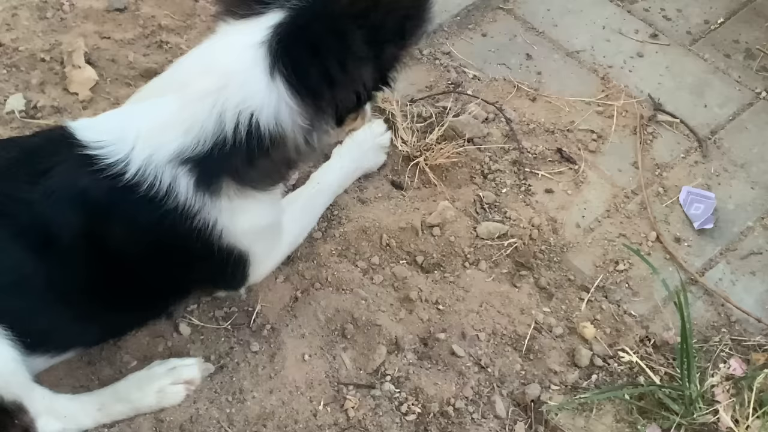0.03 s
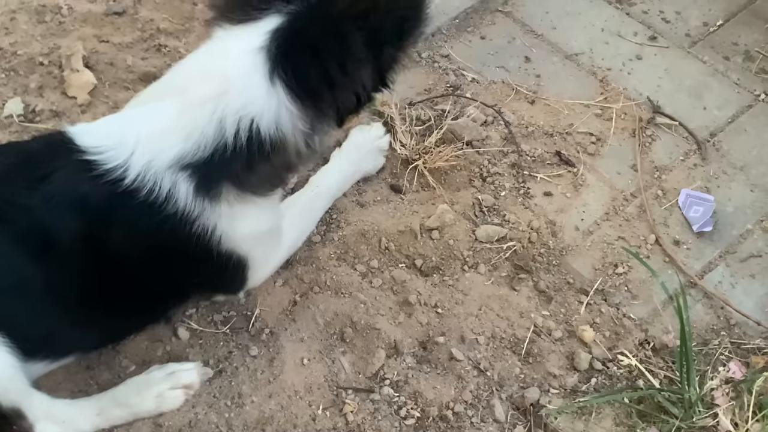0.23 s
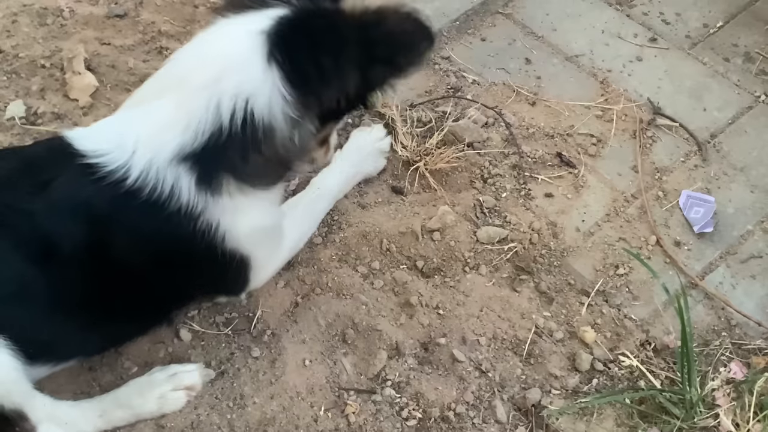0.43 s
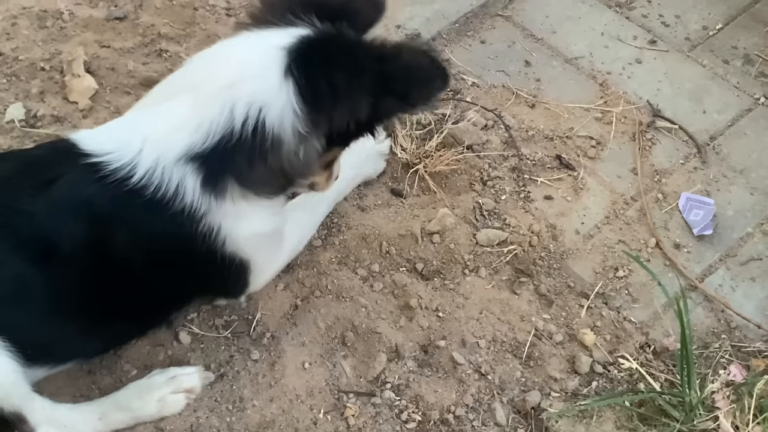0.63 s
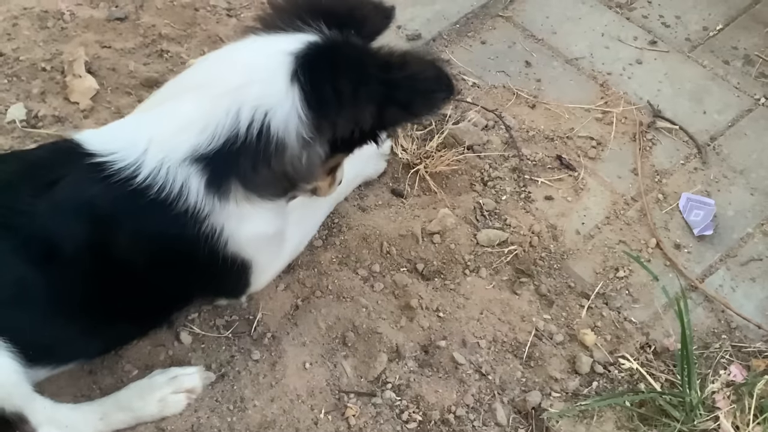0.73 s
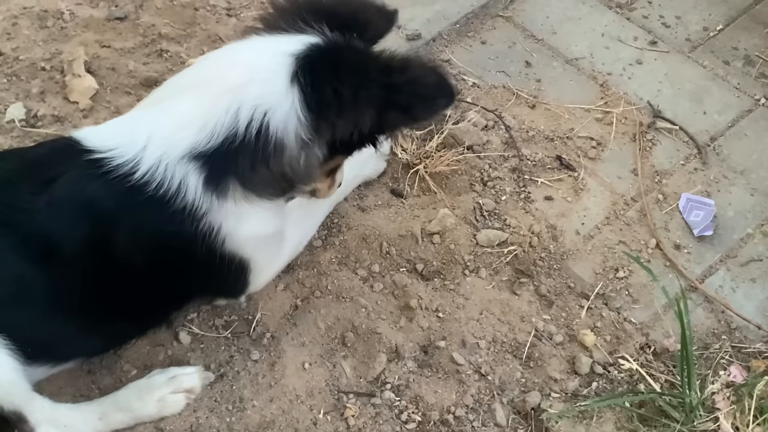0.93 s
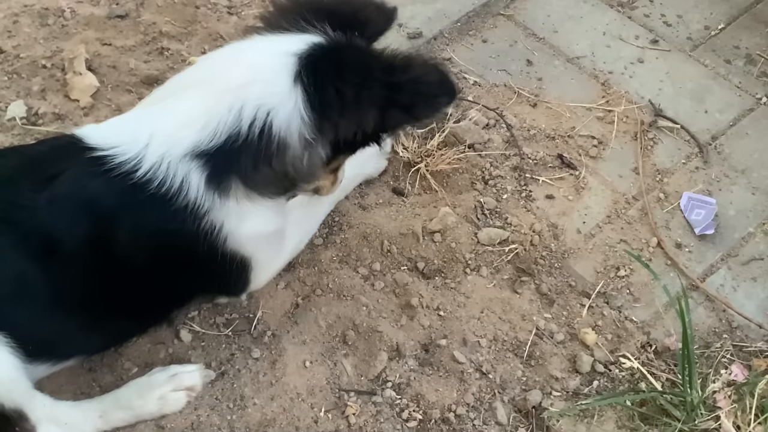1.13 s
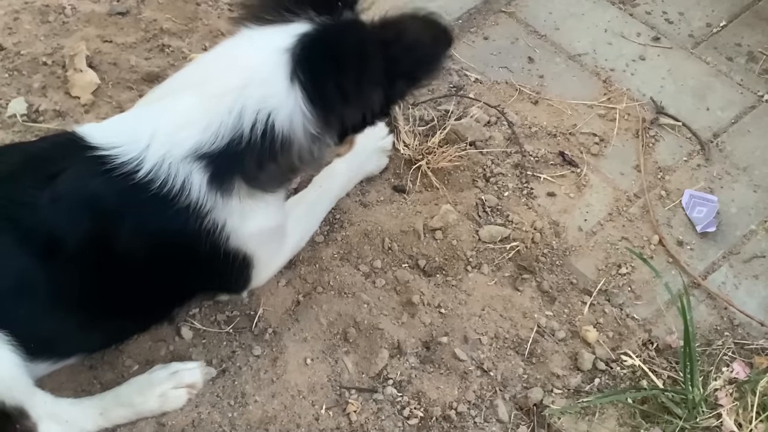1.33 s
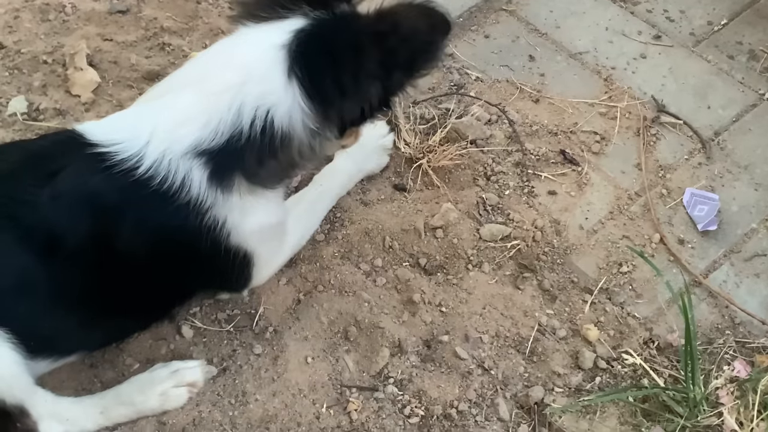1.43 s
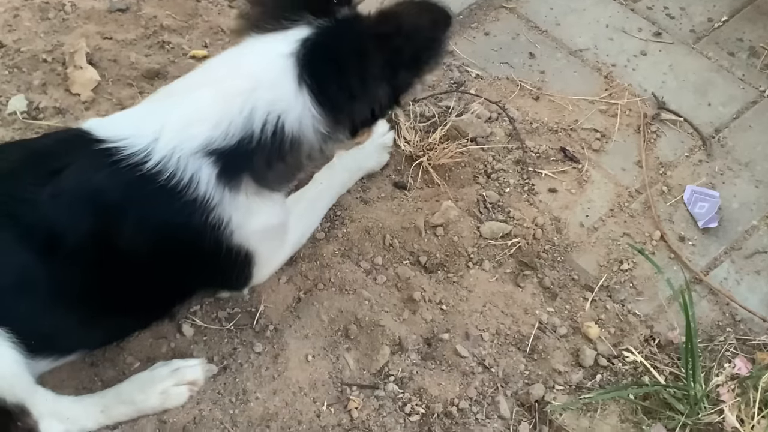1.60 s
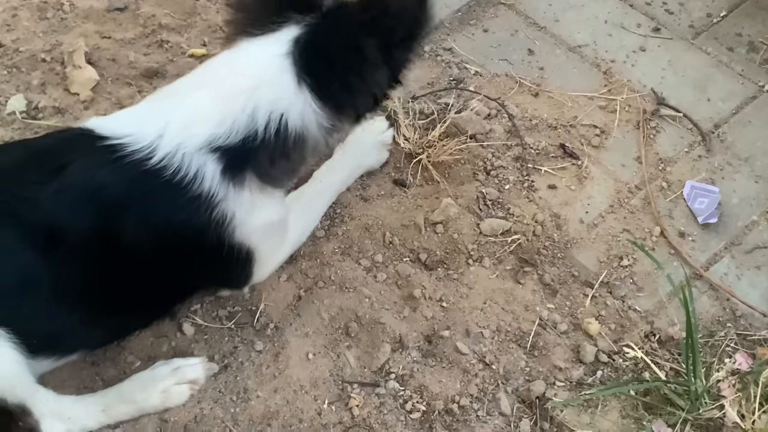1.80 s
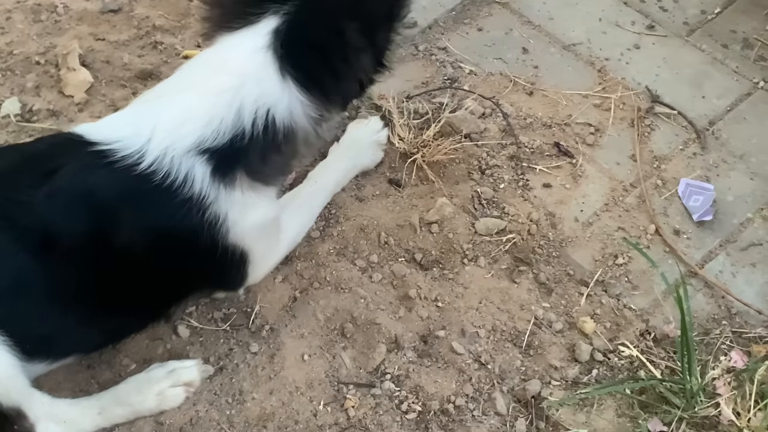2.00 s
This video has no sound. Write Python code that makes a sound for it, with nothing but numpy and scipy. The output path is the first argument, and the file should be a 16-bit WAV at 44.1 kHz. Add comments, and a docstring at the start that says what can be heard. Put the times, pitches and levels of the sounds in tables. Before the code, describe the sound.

A dog scuffs at dry dirt close by in a yard, with stalks and crumbs crackling and snapping. One loud hollow clack cuts in, then a few dull knocks and a faint scrape follow, over a low distant rumble.

```python
"""Gritty strokes: a dog lying in a yard scuffs at dry dirt; stalks and crumbs crackle and snap close by.
A hollow body is bumped lightly, then once with a loud clack: damped modes, clatter, a low boom.
Paw friction keeps it softly ringing. A few dull knocks and a faint ringing scrape follow.
Under it all, a far low rumble and outdoor hiss."""
import sys
import numpy as np
from scipy import signal
from scipy.fft import rfft, irfft
from scipy.io import wavfile

SR = 44100
rng = np.random.default_rng(int(sys.argv[2]) if len(sys.argv) > 2 else 0)


def pcm_store(signal):
    """Save signal as 16-bit PCM."""
    levels = np.round(np.clip(np.atleast_2d(signal), -1, 1) * 32767)
    wavfile.write(sys.argv[1], SR, levels.astype(np.int16).T)


N = 90669
T = np.arange(N) / SR
HZ = np.maximum(np.arange(N // 2 + 1) * SR / N, 1)
SIDES = np.array([[.5], [-.5]])  # left, right
LN_1000 = np.log(1000)  # 60 dB of decay

# paw strokes (start [s], rise [s], hold [s], t60 [s], level [dB], treble tilt [dB/oct])
SCUFFS = [(0.134, 0.021, 0.089, 0.2, -51.5, -2.5), (0.19, 0.01, 0.02, 0.74, -52.5, -5),
          (0.34, 0.016, 0.025, 0.47, -58, 2), (0.583, 0.023, 0.091, 0.5, -65, 4.5),
          (0.711, 0.05, 0.019, 0.5, -49, -4), (0.824, 0.17, 1, -7, -58.5, -3),
          (1.179, 0.022, 0.0062, 0.85, -45.5, -11.5), (1.358, 0.018, 0.012, .12, -52, -2),
          (1.401, 0.029, 0.0027, 0.17, -46, -3), (1.555, 0.022, 0.016, 0.09, -51, 2.5),
          (1.625, 0.015, 0.014, -0.65, -56.5, -0.5)]
# dirt spectrum (frequency [Hz], level [dB])
DIRT_SPECTRUM = [(150, 21), (400, 0.5), (1100, -0.5), (1550, 6.5), (2600, 3), (4000, 5), (7000, 3.5),
                 (9300, 3.5), (11500, -5.5), (14000, -6), (15200, -23), (16000, -34)]
# soft low thumps (time [s], level [dB], t60 [s])
THUMPS = [(0.25, -40.5, 0.044), (1.27, -39.5, 0.7), (1.531, -46.5, 0.34)]
# thump spectrum (frequency [Hz], level [dB])
THUMP_SPECTRUM = [(50, -18), (100, -36), (140, 4), (190, -9.5), (300, -16), (800, -35), (4000, -74)]
# stalks crushed under the paw (start [s], rise [s], hold [s], t60 [s], level [dB])
CRACKLES = [(0.136, 0.0089, 0.05, 1.25, -52)]
# crackle spectrum (frequency [Hz], level [dB])
CRACKLE_SPECTRUM = [(3000, -36), (3800, 9), (4500, -5), (5200, 8), (6000, 7), (7300, 2), (9200, 4),
                    (11500, 1), (12700, 2.5), (14200, 2), (15000, -13), (16000, -17)]
# stalk and crumb snaps (time [s], level [dB], time constant [s], woody body [dB], treble tilt [dB/oct])
SNAPS = [(0.1517, -33, 0.0022, -35, 6.5), (0.1766, -31.5, 0.0006, -18, 0), (0.1994, -31.5, 0.002, -17, 4.5),
         (0.215, -36, 0.0009, -8, 10), (0.227, -34, 0.00091, -1, 2), (0.249, -44, 0.00098, -19, 4),
         (0.2583, -32, 0.002, -24, 11), (0.2593, -21, 0.00085, -27, -5), (0.28, -40.5, 0.0011, 3.5, -14),
         (0.296, -38.5, 0.00091, -25, 13.5), (0.3617, -23, 0.00074, -38, 1.5),
         (0.368, -35, 0.0015, -33, 10), (0.4229, -35.5, 0.0013, -32, 2), (0.8126, -45.5, 0.0035, -4, -1),
         (0.9436, -45, 0.0011, -7, 7), (0.986, -50.5, 0.0014, -13.5, 7), (1.1057, -37.5, 0.0014, -4, 13),
         (1.1127, -47.5, .001, -3.5, 6.5), (1.1141, -40, 0.0022, -1.5, 7), (1.228, -37.5, 0.0031, -10, -3),
         (1.317, -36, 0.00086, -14, -2), (1.4234, -38.5, 0.0053, -4, -3), (1.567, -36, 0.0006, -5.5, 10.5),
         (1.6362, -44, 0.0025, -3, 0)]
# splinter spectrum (frequency [Hz], level [dB])
SPLINTER_SPECTRUM = [(2500, -31), (3350, -20), (3700, 8), (4600, -0.5), (5300, 3.5), (6100, 2.5),
                     (7200, -1), (8800, 11), (11500, -11.5), (13500, 3), (14500, -8), (16000, -24)]
# woody body spectrum (frequency [Hz], level [dB])
WOODY_SPECTRUM = [(300, 1), (900, -11), (1450, 12.5), (2300, -12), (3000, 9.5), (4000, -7), (6000, -36)]
# stalk modes (frequency [Hz], level [dB], t60 [s])
STALK_MODES = [(3840, -7, 0.011), (4530, -9.5, 0.01), (6160, -5, 0.0046), (8350, -1.5, 0.0073),
               (9400, -4, 0.0033), (13800, -17, 0.0025)]

# blows on the hollow body (time [s], level [dB], hard contact [dB])
BLOWS = [(0.175, -20, -42), (1.2447, 0.5, 3.5)]
# hollow body modes (frequency [Hz], level [dB], t60 [s])
HOLLOW_MODES = [(488.8, -29, 0.15), (603, -32, 0.16), (720, -21.5, 0.13), (809, -27.5, 0.089),
                (940, -36, 0.18), (1112, -38, 0.2), (1411, -26.5, 0.1), (1564, -26, 0.067),
                (1810, -28.5, 0.1), (2100, -26, 0.032), (2720, -24, 0.049), (2880, -46, 0.028),
                (3400, -26, 0.051), (4130, -35, 0.14)]
# clatter octave bands (centre [Hz], level [dB], rise [s], t60 [s])
CLATTER_BANDS = [(169, -42.5, 0.016, 0.21), (340, -37, 0.0053, 0.31), (720, -30, 0.014, 0.15),
                 (1230, -30, 0.0016, 0.15), (2800, -29, 0.00023, 0.084), (4500, -40.5, 0.00062, 0.13),
                 (9300, -61.5, .001, 0.5)]
# hard contact modes (frequency [Hz], level [dB], t60 [s])
CRACK_MODES = [(1500, -18, .009), (2150, -14, .006), (2950, -15, .006)]
# grazing contact spectrum (frequency [Hz], level [dB])
GRAZE_SPECTRUM = [(500, -12), (1600, 2), (3000, 6.5), (5500, -10), (7000, -25), (9000, -21), (16000, -50)]
# paw rubs (start [s], rise [s], hold [s], t60 [s], level [dB], treble tilt [dB/oct], pitch [ratio])
RUBS = [(0.187, 0.0093, 0.038, 0.4, -47.5, 0, 1), (0.729, 0.031, .025, -0.38, -51, 1.5, 1.11),
        (1.401, 0.018, 0.022, 0.24, -50, 5.5, 1.04)]

# dull knocks (time [s], level [dB], rubbing t60 [s], tilt [dB/oct])
KNOCKS = [(1.818, -36.5, 0.06, -0.5), (1.825, -38, 0.077, 6), (1.8555, -40, 0.15, -2),
          (1.897, -34.5, 0.087, 0.5), (2.031, -39, 0.44, -1)]
# knocked body modes (frequency [Hz], level [dB], t60 [s])
KNOCK_MODES = [(297, -2.5, 0.038), (559, -2.5, 0.066), (970, -8.5, 0.11), (1302, -3.5, 0.013),
               (1980, -6, 0.028), (3970, -13, 0.0075)]
# knock rubbing spectrum (frequency [Hz], level [dB])
KNOCK_RUB_SPECTRUM = [(150, 8), (400, -3), (760, -11), (1200, -11), (2200, -9.5), (4000, -17), (7000, -41),
                      (16000, -55)]
# scrape resonances (frequency [Hz], width [Hz], level [dB])
SCRAPE_RESONANCES = [(864, 390, 2), (1400, 100, -3), (2060, 130, 3), (2660, 370, -4), (3727, 85, 5),
                     (5870, 200, -3.5), (8500, 830, -14.5)]

# reflections off ground and paving (delay [s], level [dB])
REFLECTIONS = [(.0013, -27), (.0029, -18), (.0046, -6), (.0075, -13.5)]
# far rumble spectrum (frequency [Hz], level [dB])
RUMBLE_SPECTRUM = [(20, -75), (35, -14), (50, -2.5), (72, 1.5), (100, -4.5), (118, -2.5), (150, -8),
                   (200, -18.5), (300, -24), (500, -32), (1000, -81)]
# outdoor hiss spectrum (frequency [Hz], level [dB])
AIR_SPECTRUM = [(100, -8.5), (350, 9), (480, 1), (620, 1.5), (1000, -2.5), (1450, 3), (1750, -3.5),
                (2030, 3), (2800, -9.5), (6000, -19), (9500, -18), (14300, -21), (15200, -52), (16000, -37)]

DOG_LAG_S, HOLLOW_LEAD_S = 0.0002, 0.00015  # left ear relative to right


def scuffs(grain_share=0.55, pan_db=-0.5):
    """Paw strokes stir grit and hissing dust."""
    grains = np.sqrt(grain_share) * grit(per_s=1400, spread_db=4)
    dust = np.sqrt(1 - grain_share) * white()
    strokes = 0
    for start, rise, hold, t60, db, tilt in SCUFFS:
        dirt = stereo(grains + dust, colour(DIRT_SPECTRUM) * treble(tilt), 0.27, DOG_LAG_S, pan_db)
        strokes += from_db(db) * swell(start, rise, hold, t60) * dirt
    return strokes


def thumps():
    """Soft low thumps: two under paw strokes; at 1.27 s the boom of the loud hollow clack."""
    low = stereo(white(), colour(THUMP_SPECTRUM), coherence=0.92, pan_db=-0.5)
    return low * sum(from_db(db) * swell(start, 0.011, 0, t60) for start, db, t60 in THUMPS)


def crackle():
    """Fibres break in a dense, bright spray of tiny clicks."""
    clicks = grit(per_s=2200, spread_db=2.5)
    fibres = stereo(clicks, colour(CRACKLE_SPECTRUM), coherence=1, lag_s=0.000291)
    return fibres * sum(from_db(db) * swell(*timing) for *timing, db in CRACKLES)


def snaps(coherence=0.64, lag_s=0.0001773, pan_db=-4.5):
    """A stalk rings briefly and splinters: bright burst, woody body, short scatter."""
    noise, bright = white(), colour(SPLINTER_SPECTRUM)
    wood = stereo(white(), colour(WOODY_SPECTRUM), coherence, DOG_LAG_S)
    bursts = rings = 0
    for start, db, tau_s, wood_db, tilt in SNAPS:
        burst = swell(start, 0.0001, tau_s / 2, tau_s * LN_1000)
        scatter = from_db(-16.5) * swell(start, 0.0019, 0, 0.051)
        splinters = from_db(-6) * stereo(noise, bright * treble(tilt), coherence, lag_s, pan_db)
        bursts += from_db(db) * (burst + scatter) * (splinters + from_db(wood_db) * wood)
        rings += from_db(db) * struck(STALK_MODES, start, lag_s, tilt)
    return bursts + butterworth(rings, "high", cutoff_hz=3550, order=5) * from_db(SIDES * pan_db)


def hollow_blows(coherence=0.29, rise_cycles=4.8, graze_tau_s=0.0024, echo_db=-13):
    """A graze and a crack set the hollow body ringing and clattering; the yard echoes weakly."""
    skid = stereo(white(), colour(GRAZE_SPECTRUM), coherence, -HOLLOW_LEAD_S)
    bands = [stereo(grit(per_s=4000, spread_db=2), octave(hz), coherence, -HOLLOW_LEAD_S, pan_db=1)
             for hz, *_ in CLATTER_BANDS]
    out = 0
    for start, db, contact_db in BLOWS:
        ring = clatter = 0
        for hz, mode_db, t60 in HOLLOW_MODES:
            lead_s = HOLLOW_LEAD_S * (1 + (610 / hz) ** 2)  # low modes lead further on the left
            cycles = hz * (T - start + SIDES * lead_s) + rng.random()
            ring += from_db(mode_db) * swell(start, rise_cycles / hz, 0, t60) * np.sin(2 * np.pi * cycles)
        echo = from_db(echo_db) * swell(start, 0.023, 0, 0.37)
        for band, (_, band_db, rise, t60) in zip(bands, CLATTER_BANDS):
            clatter += from_db(band_db) * band * (swell(start, rise, 0, t60) + echo)
        crack = butterworth(struck(CRACK_MODES, start, -HOLLOW_LEAD_S), "low", cutoff_hz=4370, order=4)
        graze = from_db(-23.5) * skid * np.exp(-np.minimum(abs(T - start) / graze_tau_s, 20))
        out += from_db(db) * (ring + clatter + from_db(contact_db) * (crack + graze))
    return out


def rubs():
    """Paw friction keeps the hollow body's modes softly ringing."""
    power = sum(from_db(db) ** 2 / ((LN_1000 / t60) ** 2 + (2 * np.pi * (HZ - hz)) ** 2)
                for hz, db, t60 in HOLLOW_MODES)
    noise, out = white(), 0
    for start, rise, hold, t60, db, tilt, pitch in RUBS:
        gain = np.interp(HZ / pitch, HZ, np.sqrt(power)) * treble(tilt)
        friction = stereo(noise, gain, coherence=0.6, lag_s=-HOLLOW_LEAD_S)
        out += from_db(db) * swell(start, rise, hold, t60) * friction
    return out


def knocks(lag_s=0.00017):
    """Soft contacts on a well damped body, each with a little rubbing noise."""
    rub = from_db(-8.5) * stereo(white(), colour(KNOCK_RUB_SPECTRUM), 0.39, lag_s, pan_db=-1)
    out = 0
    for start, db, rub_t60, tilt in KNOCKS:
        ring = struck(KNOCK_MODES, start, lag_s, tilt)
        out += from_db(db) * (ring + rub * swell(start, 0.00052, 0, rub_t60))
    return out


def scrape():
    """Fine friction excites a few narrow resonances."""
    power = sum(from_db(db) ** 2 / (1 + ((HZ ** 2 - hz ** 2) / (HZ * width_hz)) ** 2)
                for hz, width_hz, db in SCRAPE_RESONANCES)
    envelope = swell(start_s=1.85, rise_s=0.09, hold_s=0.12, t60_s=0.3)
    return from_db(-51.5) * envelope * stereo(white(), np.sqrt(power), coherence=0.2)


def reflected(x, path_spread=0.023):
    """Direct sound plus short reflections; the path differs slightly per ear."""
    out = x.copy()
    for delay_s, db in REFLECTIONS:
        for ear, ear_delay_s in enumerate(delay_s * (1 + SIDES * path_spread)):
            out[ear] += from_db(db) * np.interp(T - ear_delay_s, T, x[ear], left=0)
    return out


def background():
    """Steady far rumble, nearly alike in both ears, and diffuse outdoor hiss."""
    rumble = stereo(white(), colour(RUMBLE_SPECTRUM), coherence=0.92, pan_db=-1.5)
    air = stereo(white(), colour(AIR_SPECTRUM), coherence=0.11, lag_s=DOG_LAG_S)
    return from_db(-42) * rumble + from_db(-55.5) * air


def struck(modes, start_s, lag_s, db_per_octave=0):
    """Damped sines of alternating sign, tilted about the third mode."""
    span = slice(int(start_s * SR) - 50, int(start_s * SR) + SR // 5)
    t = np.maximum(T[span] - start_s - SIDES * lag_s, 0)
    out = np.zeros((2, N))
    for k, (hz, db, t60) in enumerate(modes):
        gain = (-1) ** k * from_db(db + db_per_octave * np.log2(hz / modes[2][0]))
        out[:, span] += gain * np.exp(-LN_1000 * t / t60) * np.sin(2 * np.pi * hz * t)
    return out


def swell(start_s, rise_s, hold_s, t60_s):
    """Linear rise, hold, exponential fade; a negative t60 cuts off at once."""
    t = T - start_s
    fade = np.clip((t - rise_s - hold_s) / max(t60_s, 1e-4), 0, 10)
    return np.clip(t / rise_s, 0, 1) * np.exp(-LN_1000 * fade)


def grit(per_s, spread_db):
    """Impulses of random size, rms 1; rows (shared, left, right) differ in sign only."""
    sizes = from_db(spread_db * np.minimum(rng.exponential(1, N), 4))
    hits = rng.random(N) < per_s / SR
    grains = sizes * hits * rng.choice([-1, 1], (3, N))
    return grains / grains.std()


def white():
    """White noise; rows (shared, left, right)."""
    return rng.standard_normal((3, N))


def stereo(noise, gain, coherence, lag_s=0, pan_db=0):
    """Filtered shared plus diffuse noise, rms 1 before panning. Positive lag, pan: left later, louder."""
    spectra = rfft(noise)
    direct = np.sqrt(coherence) * spectra[0] * np.exp(-2j * np.pi * HZ * lag_s * SIDES)
    diffuse = np.sqrt(1 - coherence) * spectra[1:]
    x = irfft((direct + diffuse) * gain, N)
    return x / np.sqrt(np.mean(x ** 2)) * from_db(SIDES * pan_db)


def colour(points):
    """Gain curve through the points; falls 12 dB/oct below the first."""
    hz, db = np.transpose(points)
    return from_db(np.interp(np.log(HZ), np.log(hz), db)) * np.minimum(HZ / hz[0], 1) ** 2


def treble(db_per_octave):
    """Gain of a slope above 1 kHz."""
    return from_db(db_per_octave * np.log2(np.maximum(HZ / 1000, 1)))


def octave(centre_hz):
    """Gain of an octave band."""
    return 1 / np.sqrt(1 + (2 * np.log2(HZ / centre_hz)) ** 8)


def butterworth(x, kind, cutoff_hz, order):
    """High- or low-pass; the offset avoids denormals."""
    return signal.sosfilt(signal.butter(order, cutoff_hz, kind, fs=SR, output="sos"), x + 1e-18)


def from_db(db):
    """Decibels to gain."""
    return 10 ** (np.asarray(db) / 20)


def scene():
    """All yard sources, summed."""
    with_reflections = reflected(scuffs() + thumps() + crackle() + knocks() + scrape())
    return with_reflections + snaps() + hollow_blows() + rubs() + background()


def record(dry):
    """Steep low-pass at 16.3 kHz."""
    return signal.sosfilt(signal.ellip(10, .2, 80, 16300, fs=SR, output="sos"), dry)


dry = scene()
out = record(dry)
pcm_store(out)
```